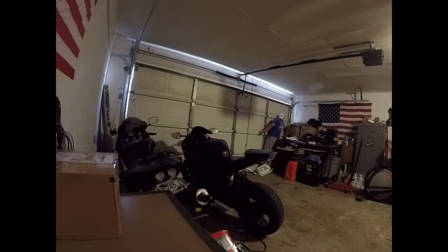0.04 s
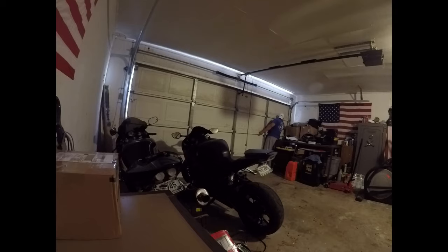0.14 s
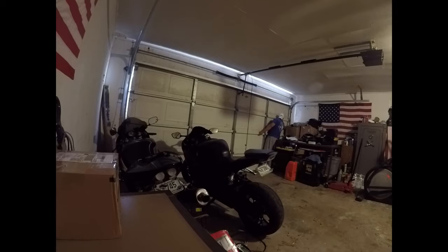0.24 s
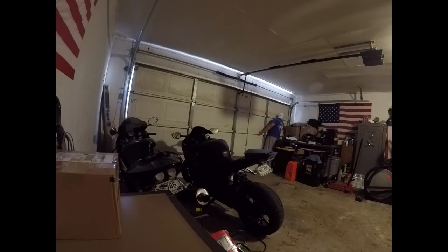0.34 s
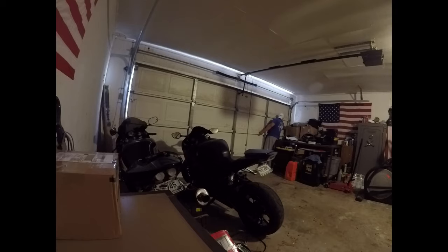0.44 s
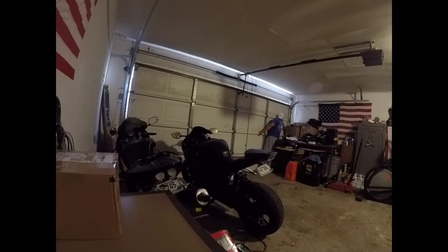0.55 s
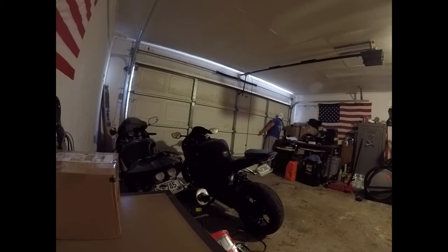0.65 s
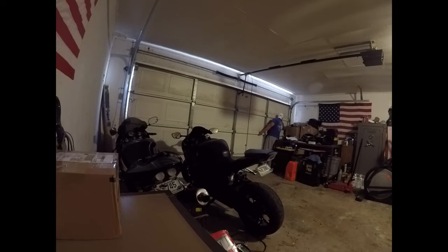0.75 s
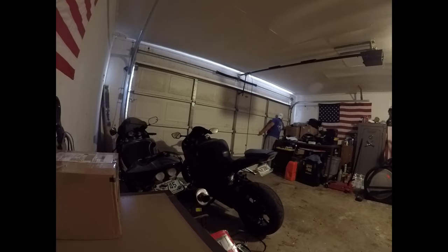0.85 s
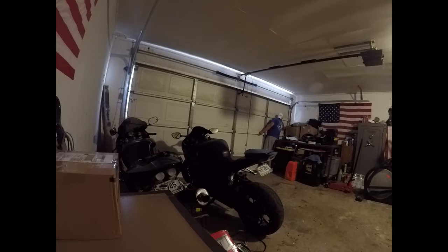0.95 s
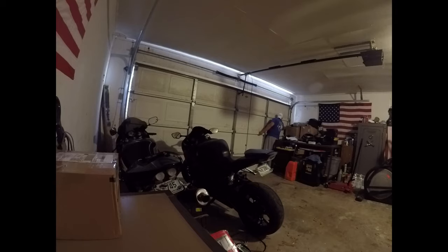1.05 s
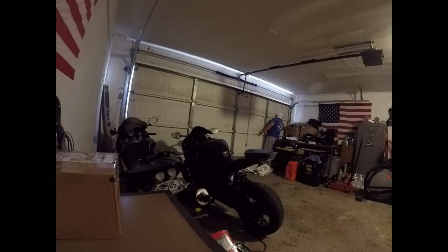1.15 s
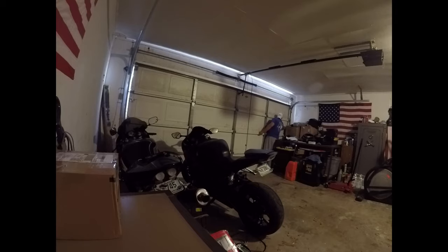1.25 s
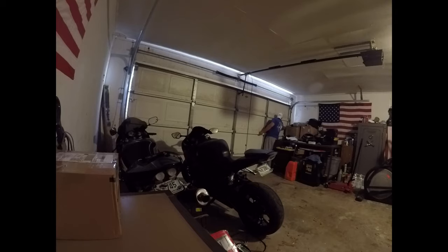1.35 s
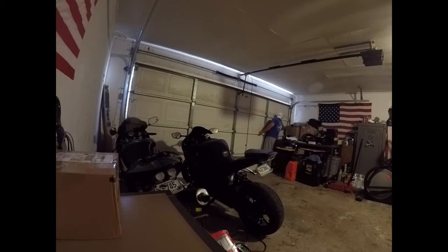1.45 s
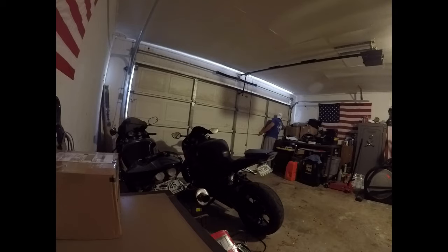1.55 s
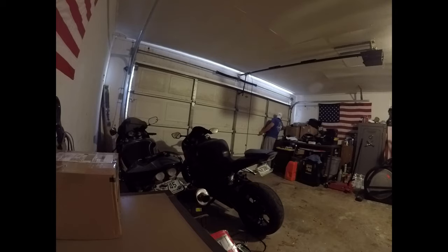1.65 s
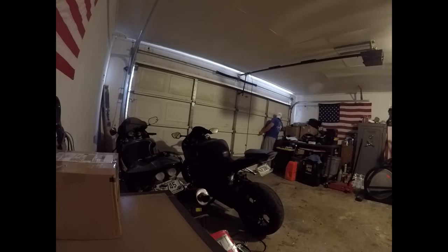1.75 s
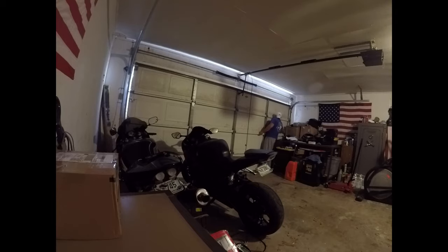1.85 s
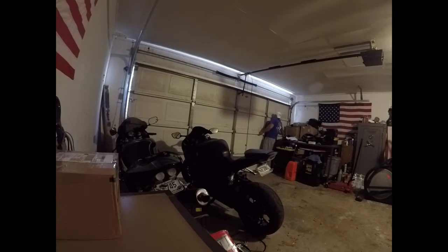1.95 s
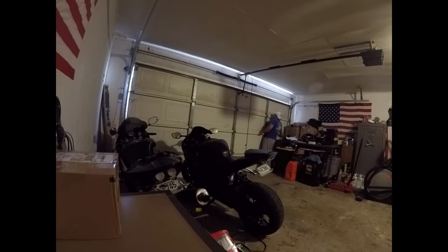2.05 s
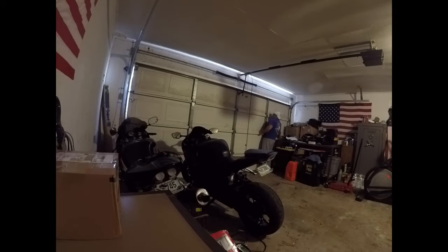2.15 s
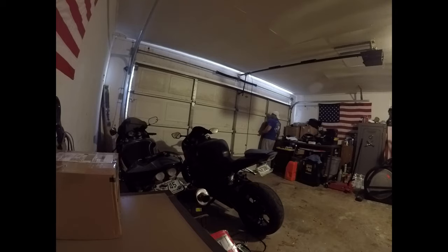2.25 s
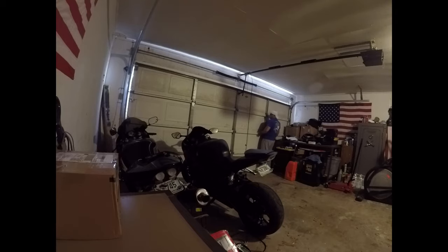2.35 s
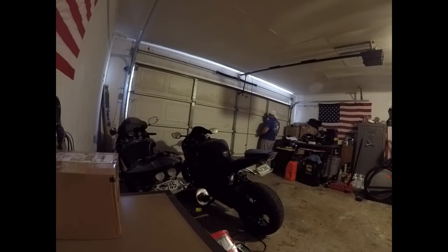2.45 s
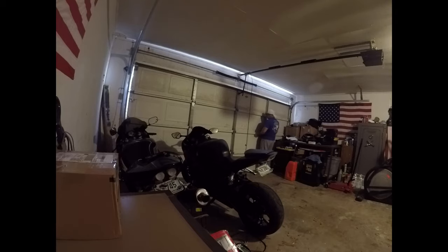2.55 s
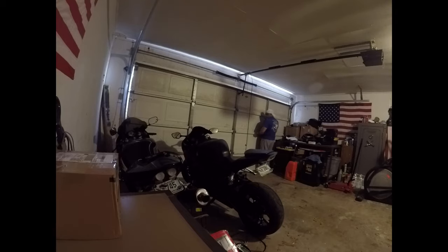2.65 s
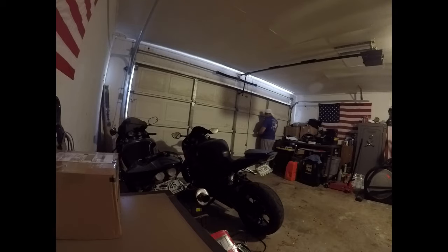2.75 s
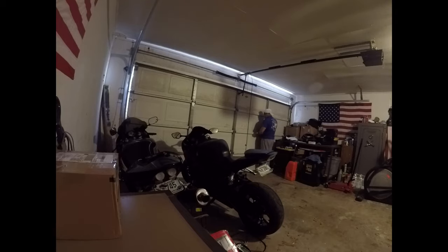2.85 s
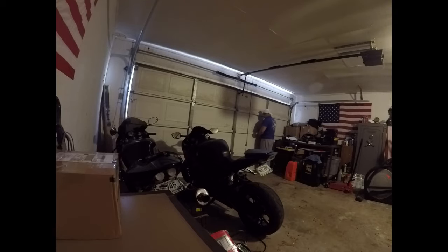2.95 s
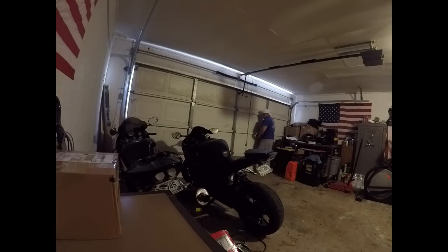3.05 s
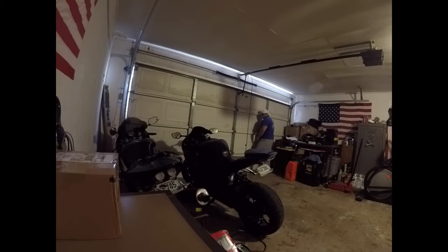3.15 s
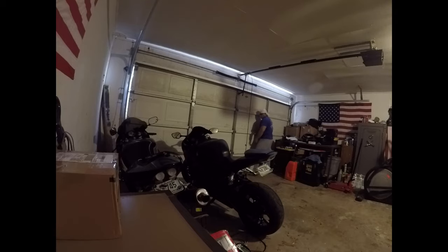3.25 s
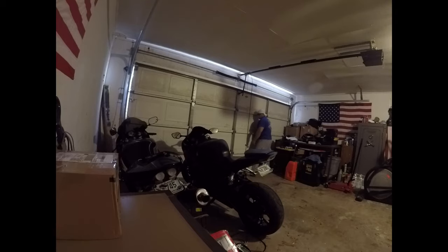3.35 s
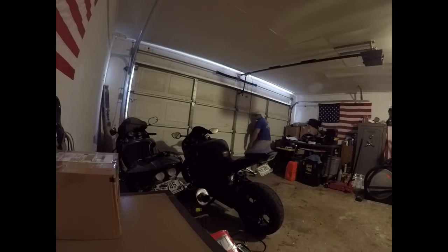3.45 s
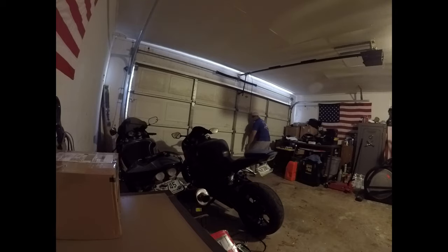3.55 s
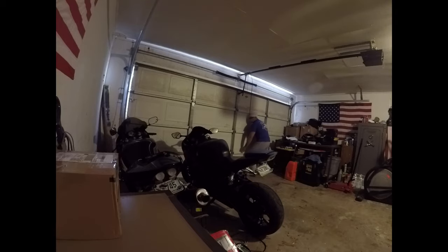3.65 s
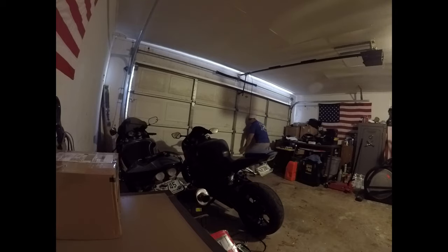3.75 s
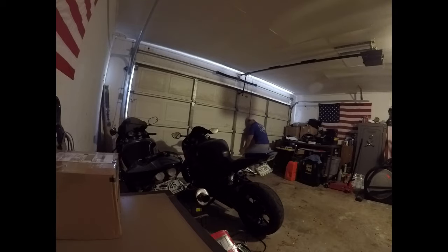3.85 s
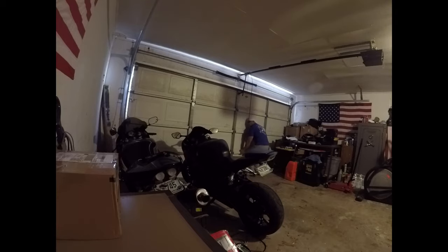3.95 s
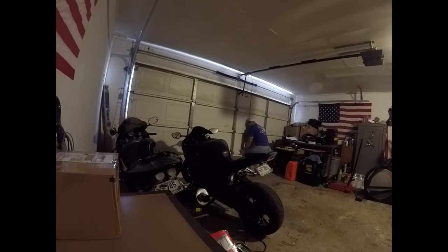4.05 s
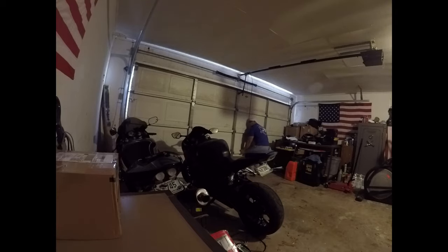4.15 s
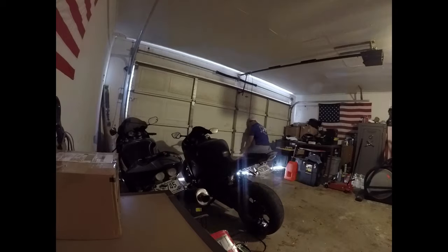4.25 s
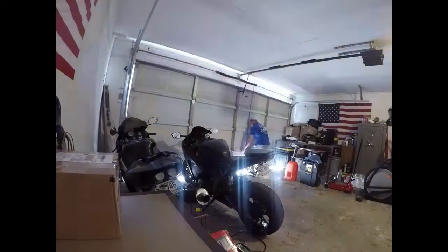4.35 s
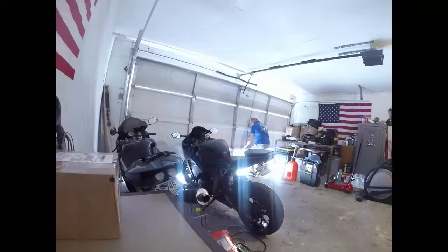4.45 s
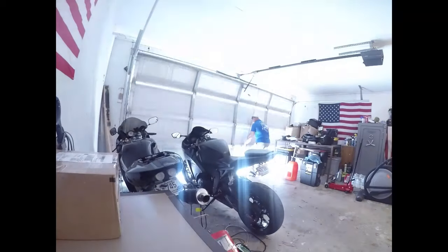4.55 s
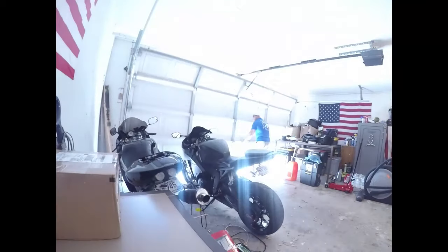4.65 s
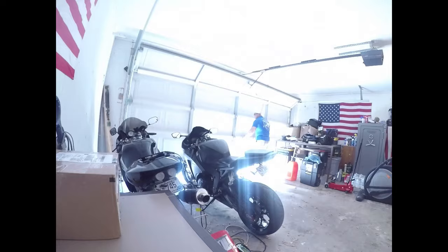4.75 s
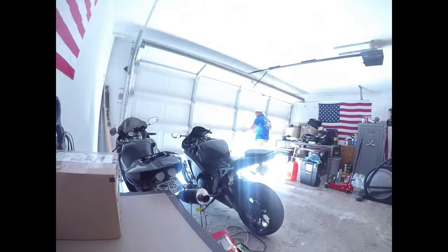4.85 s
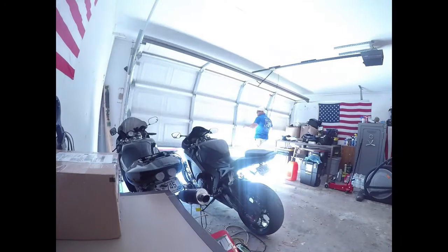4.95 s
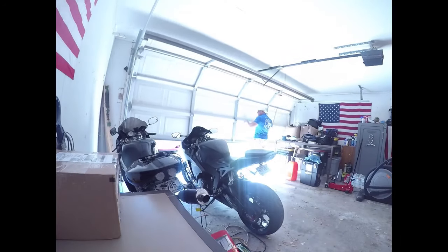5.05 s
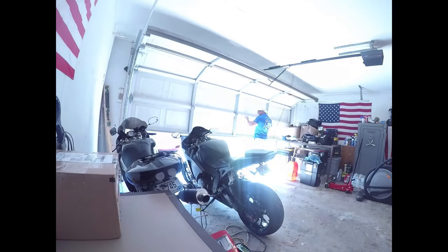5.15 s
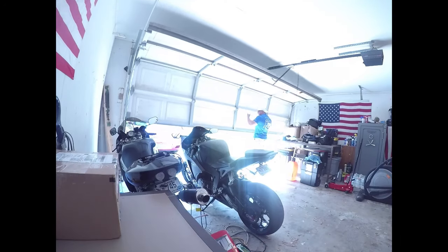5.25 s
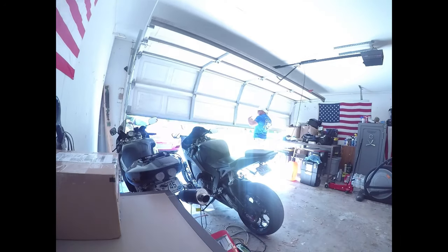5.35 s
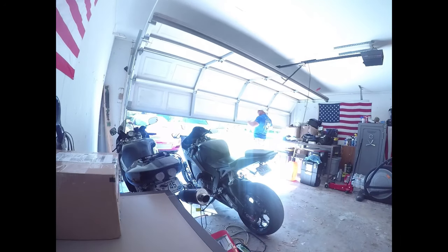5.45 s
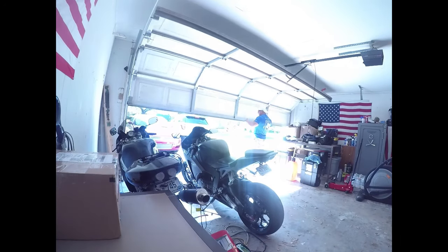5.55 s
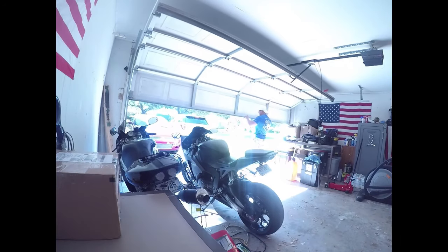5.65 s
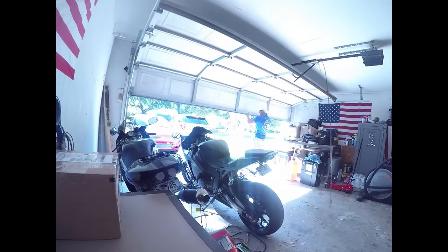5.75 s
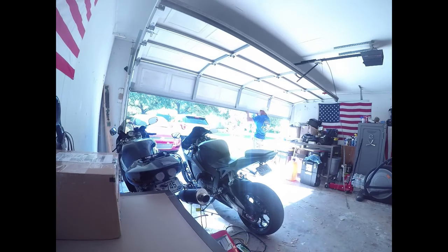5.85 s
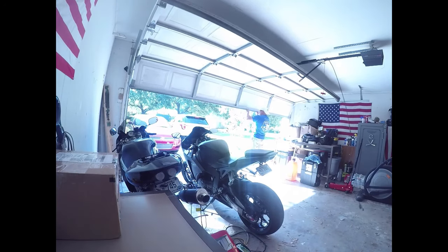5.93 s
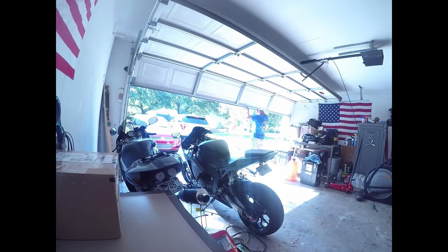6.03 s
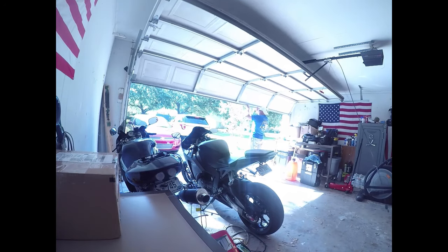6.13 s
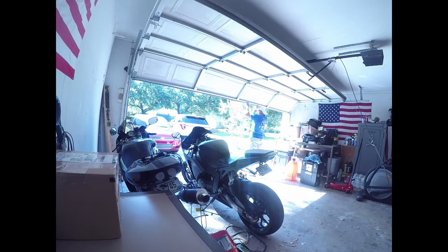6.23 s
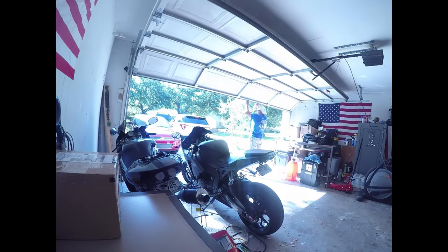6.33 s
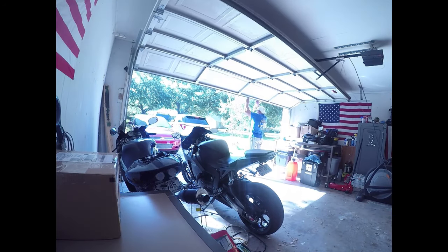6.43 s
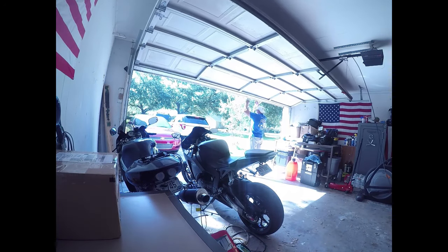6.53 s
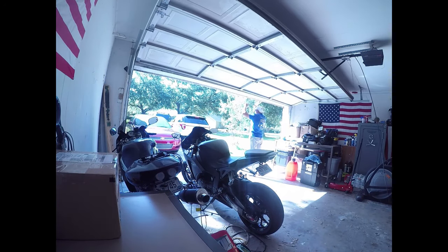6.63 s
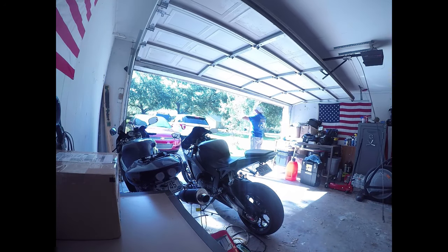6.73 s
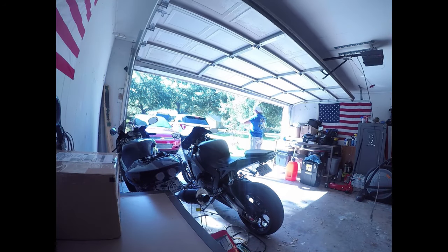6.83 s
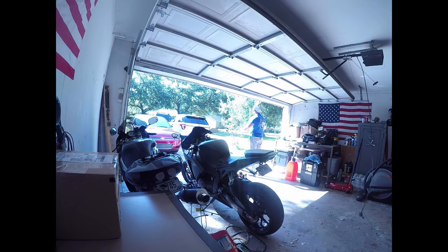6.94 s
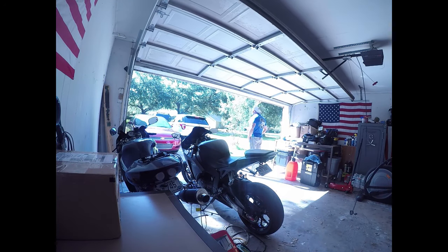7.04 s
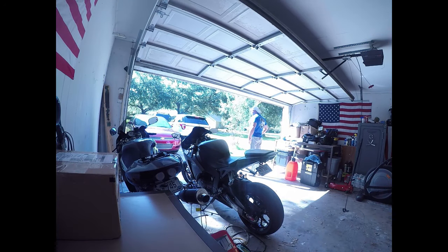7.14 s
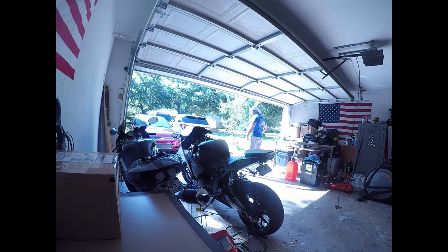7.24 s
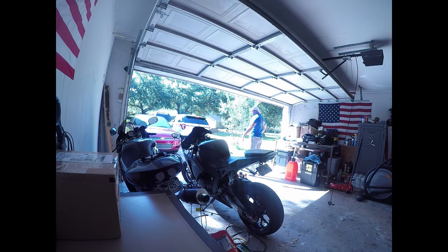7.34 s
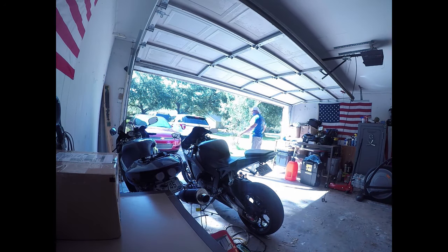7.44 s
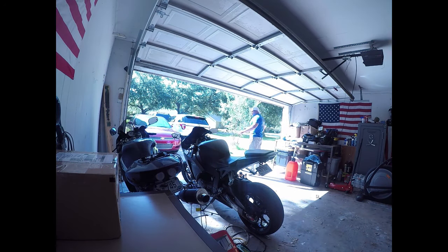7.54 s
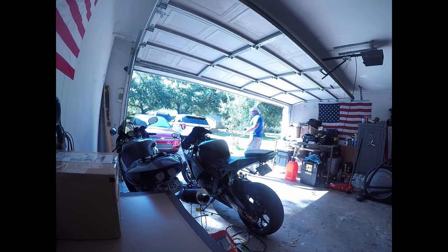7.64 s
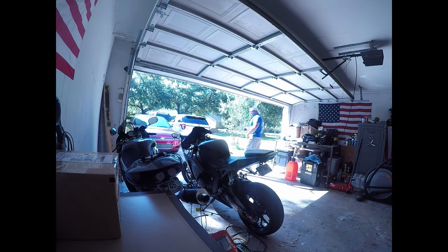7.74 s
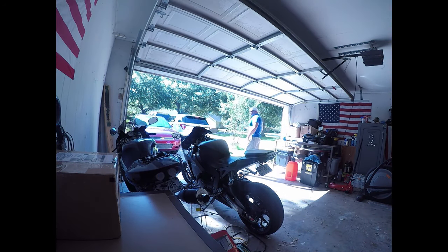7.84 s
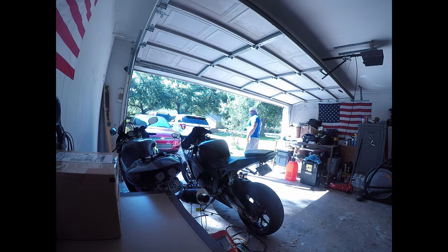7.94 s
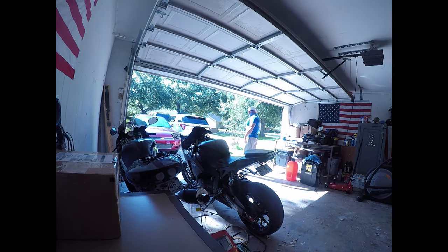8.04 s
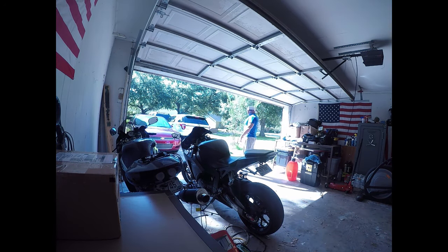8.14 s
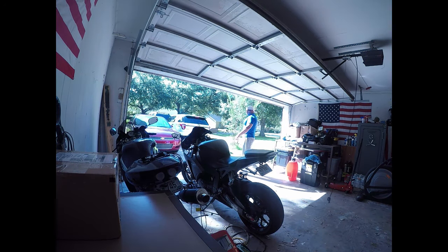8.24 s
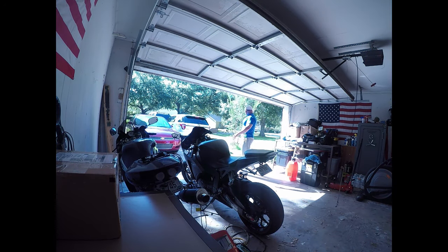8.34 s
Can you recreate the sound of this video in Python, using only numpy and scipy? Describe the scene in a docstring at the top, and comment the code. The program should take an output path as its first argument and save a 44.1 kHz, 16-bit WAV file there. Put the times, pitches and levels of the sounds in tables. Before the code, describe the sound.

From the back of a hard, echoing garage, two microphones pick up faint hiss and small metal scuffs. Light knocks come near 0.55 s, then a lock bar bangs at about 0.8 s with a low panel boom and shivering metal. At 1.5 s a latch snaps brightly and bounces. From 2 to 4 s there are only quiet clinks, a faint knock and fading low rumble. At 4.13 s the door cracks loose; from 4.5 s rollers and hinges rattle loudly up the tracks, with scraping squeals, bright tinks and deep panel thumps, strongest around 4.7-5.7 s. The clatter eases near 6.1 s, surges at 6.4 s with another boom, and drops away by 6.9 s. Weak squeaks, a soft thump at 7.15 s, hollow clacks at 7.5 s and very low swaying bumps fade into room drone and hiss until about 8.4 s.

```python
"""A sectional steel garage door is unlatched and pushed up by hand, heard from the back of a hard-walled garage.
The lock bar bangs, a latch snaps and the panels tremble; then rollers rattle and squeal up the tracks until
the door rests overhead, swaying. Random metal contacts excite five filtered ranges of the door, decaying
sines make the small hardware, gliding tones the squeals and pulsed low tones the panel booms.
Echoes carry it to two microphones, over the low rumble and drone of the sway and a faint hiss."""
import sys
import numpy as np
from scipy import signal
from scipy.fft import rfft, irfft, next_fast_len
from scipy.io import wavfile
from scipy.ndimage import uniform_filter1d

SR = 44100
rng = np.random.default_rng(int(sys.argv[2]) if len(sys.argv) > 2 else 0)


def wrap_up_sound(samples):
    """Save the sound to the file named by the first command line argument, as 16-bit audio."""
    columns = np.atleast_2d(samples).T
    # keep every value between -1 and 1, then stretch to whole-number steps
    tamed = np.clip(columns, -1, 1)
    steps = np.round(tamed * 32767).astype(np.int16)
    wavfile.write(sys.argv[1], SR, steps)


N = 369999
T = np.arange(N) / SR

# Source levels below are as at the door, before the paths to the microphones; colours are relative.
# the door's parts: panel boom, frame knock, sheet clatter, track clank, hinge chink [low f/Hz, high f/Hz]
PARTS = [(95, 300), (300, 850), (850, 2000), (2000, 5000), (5000, 15000)]
# colour of the whole door [f/Hz, spectral level/dB]
DOOR_COLOUR = [(90, -25), (160, 4), (270, -15), (380, -17.5), (520, -16.5), (1150, -13.5), (2200, -20),
               (3400, -17), (4600, -26), (6200, -19.5), (7400, -12), (8300, -20), (10300, -27),
               (11500, -36.5), (14500, -38.5)]
# narrow resonances of panels and tracks [f/Hz, width/Hz, level/dB]
DOOR_MODES = [(186, 104, 3), (525.6, 56, 4.5), (825, 12, 1), (2145, 16, -11), (3350, 82, -2),
              (4710, 110, 3), (6340, 1060, 4.5)]
# how hard the rolling door shakes: pushed off, coasting, pushed home, slowing [t/s, level/dB]
EFFORT = [(4.32, -29.5), (4.56, -19), (5.17, -15.5), (5.48, -16.5), (5.65, -15.5), (6.11, -20), (6.3, -17),
          (6.42, -14.5), (6.63, -18), (6.92, -33), (7.0, -28), (7.45, -49)]
# answer of each part of the door
# [trembling share/dB, rolling share/dB, change as the door rises/dB per s, dying/dB per s]
PART_RESPONSE = [(-23, -6.5, 0.38, 23.5), (-19.5, -8.5, 0, 61), (-26.5, -2, -1.9, 306), (-44, -5, -3, 378),
                 (-39, -8.5, -1.5, 400)]
# share of each part of the door in a blow or rub [level/dB, slope/dB per dB of brightness]
TOUCH = [(-10.5, -2), (-4.5, -1.27), (-2.5, -0.78), (-1.5, 0.4), (1.5, 2)]
# soft rubs and scuffs of the hardware [t at the peak/s, level/dB, brightness/dB]
RUBS = [(0, -53, -7), (0.34, -48.5, -6), (0.73, -51, -3.5), (1.39, -45.5, 0.5), (2.113, -49, -4),
        (2.312, -49.5, -7.5), (2.58, -54, -4), (2.69, -53.5, -3.5), (4.019, -50.5, -3.5), (4.76, -25.5, 2),
        (6.42, -24.5, -4.5), (7.77, -56.5, 6)]
# blows on lock, hinges and tracks [t/s, level/dB, brightness/dB, chatter decay/s, at least 1 ms in use]
BLOWS = [ (0.077, -44.5, -1.5, 0.0037), (0.505, -45, 1.5, 0.0075), (0.751, -29, -1, 0.02),
         (0.795, -20, 2, 0.007), (0.824, -28, -10, 0.014), (0.895, -25.5, -5.5, 0.011),
         (1.487, -36.5, -3, 0.021), (1.521, -21.5, 1.5, 0.011), (1.650, -29.5, -2.5, 0.019),
         (2.25, -44, -2.5, 0.017), (2.903, -49, -3, 0.015), (3.464, -52.5, 0.5, 0.0071),
         (3.69, -51, 0.5, 0.02), (4.065, -40, -0.5, 0.00092), (4.129, -22, -2, 0.0066),
         (4.160, -26.5, -3, 0.059), (4.47, -31, -10, 0.0086), (4.565, -31, -8, 0.0085),
         (4.636, -28.5, -7.5, 0.005), (4.702, -33.5, -5, .005), (4.816, -25.5, -4, 0.011),
         (4.964, -36, -2, 0.0036), (5.135, -23.5, 0.5, 0.0078), (5.176, -28, 1, 0.0035),
         (5.238, -27, 0, 0.0047), (5.403, -28, 0.5, 0.002), (5.477, -33, 0, 0.003),
         (5.559, -27.5, -1.5, 0.0092), (5.749, -34, -4, 0.0043), (5.78, -29, -1.5, 0.0046),
         (6.181, -31, -2, 0.0024), (6.29, -32.5, -9.5, 0.0044), (6.346, -33, -0.5, 0.0071),
         (6.379, -27.5, 0.5, 0.0055), (6.5, -32.5, -11.5, 0.0042), (6.547, -31, -9.5, 0.0067),
         (6.77, -41.5, -9, 0.0042), (6.838, -36, -1.5, 0.012), (7.304, -47.5, -3, 0.0013),
         (7.513, -47, -1.5, 0.003)]
# panels flex with a dull thump [t/s, level/dB]
THUMPS = [(0.812, -27), (1.056, -28), (1.521, -27.5), (2.257, -38.5), (4.24, -25), (4.724, -15),
          (4.812, -20), (5.142, -20.5), (5.22, -19.5), (7.141, -29)]
# dry rollers and pins squeal and groan, or scrape when the pitch wavers widely
# [t/s, length/s, start f/Hz, end f/Hz, level/dB, rms waver/share of f]
SQUEALS = [ (0.365, 0.04, 8480, 8440, -35, 0.0015), (4.144, 0.062, 1090, 1157, -19.5, 0.084),
           (4.368, 0.037, 1197, 1094, -23, 0.18), (4.511, 0.21, 1147, 1354, -15.5, 0.31),
           (4.518, 0.037, 10300, 10490, -27.5, 0.003), (4.52, 0.04, 13650, 13650, -39, .004),
           (4.547, 0.054, 6670, 6390, -21, 0.011), (4.722, 0.054, 2900, 2616, -15, 0.24),
           (4.93, 0.14, 1641, 1256, -17, 0.2), (5.073, 0.03, 8200, 7900, -23.5, 0.013),
           (5.105, 0.045, 7470, 7230, -17.5, 0.013), (5.599, 0.17, 5250, 4030, -20.5, 0.024),
           (5.629, 0.067, 4820, 4770, -26, 0.0099), (5.76, 0.19, 4090, 4000, -23.5, 0.018),
           (5.94, 0.065, 3900, 3690, -30, 0.019), (5.9, 0.03, 6040, 5880, -25.5, 0.0092),
           (6.208, 0.032, 1950, 1860, -27, 0.012), (6.34, 0.014, 1960, 1940, -31, 0.014),
           (6.835, 0.059, 1864, 1854, -36.5, 0.018), (6.94, 0.057, 1855, 1890, -34, 0.016),
           (6.945, 0.071, 3740, 3760, -43, 0.03), (7.0, 0.114, 1900, 1830, -39, 0.02),
           (7.376, 0.053, 3140, 3060, -52, 0.014), (7.902, 0.063, 370, 449, -45.5, .35)]
# panels boom or hum as they are jolted or bend through the curve of the track
# [t at the peak/s, half width/s, f/Hz, level/dB]
BOOMS = [(0.48, 0.12, 190, -39.5), (0.835, 0.0093, 171, -13), (1.07, 0.022, 165.6, -15),
         (1.38, 0.2, 176.8, -32.5), (4.278, 0.053, 165, -23), (4.691, 0.085, 175, -22),
         (4.849, 0.058, 160, -12), (5.235, 0.018, 160, -14), (5.321, 0.042, 160, -13),
         (5.452, 0.088, 105, -24), (5.681, 0.18, 119, -21), (6.408, 0.027, 155, -21),
         (6.481, 0.088, 125, -14.5), (7.18, 0.052, 235.3, -30), (7.6, 0.23, 162.2, -38)]
# the spring latch snaps home and bounces [t/s, level/dB]
SNAPS = [(1.5396, -11.5), (1.544, -25), (1.5505, -21)]
# steel rings of the latch [f/Hz, level/dB, t60/s]
LATCH_MODES = [(3010, -8, 0.04), (6330, 7, 0.029), (6720, 13, .04), (6950, 21, 0.037), (6970, 5, .035),
               (8260, 3, .012), (8540, 2, 0.025)]
# light knocks on something close by [t/s, level/dB]
KNOCKS = [(0.547, -32.5), (0.579, -38.5), (0.603, -40.5), (0.63, -54), (3.347, -49.5)]
# rings of a light knock [f/Hz, level/dB, t60/s]
KNOCK_MODES = [(540, 4, 0.04), (750, 7, 0.022), (935, 8.5, 0.02), (1160, 8, 0.022), (1380, 5, 0.016),
               (1640, -4, .014), (1850, -9, .01)]
# hinge pins tink brightly as the panels fold and settle [t/s, level/dB]
TINKS = [(4.912, -24.5), (5.486, -23), (6.836, -40), (7.218, -50), (7.304, -42.5)]
# rings of a hinge pin [f/Hz, level/dB, t60/s]
TINK_MODES = [(6340, 4.5, 0.027), (6700, -5, 0.017), (7160, 5, 0.028), (7470, -6, 0.03)]
# the lock hardware clinks as it is handled [t/s, level/dB]
CLINKS = [(0.078, -44), (2.250, -45), (2.260, -39), (2.275, -41), (2.595, -53), (2.685, -54), (2.905, -48),
          (2.915, -55)]
# rings of the lock hardware [f/Hz, level/dB, t60/s]
CLINK_MODES = [(364, 0, .06), (790, -9, .015), (1460, 0, 0.017), (2430, -1, 0.013), (3080, 2, .024),
               (3380, -1, .018)]
# loose steel clacks hollowly, hardest as the door meets its stop [t/s, level/dB]
CLACKS = [(7.515, -35), (7.528, -38), (7.549, -39.5), (7.576, -46)]
# rings of the loose steel [f/Hz, level/dB, t60/s]
CLACK_MODES = [(825, 4.5, .05), (930, 1, .03), (1024, 5, .03), (1280, 5, 0.028), (1980, 1, 0.013),
               (2700, 5, 0.012), (2820, 6, .011), (3420, 2, 0.0089), (3670, -7, .008)]
# the rocking door gives soft, very low bumps [t/s, level/dB]
BUMPS = [(1.56, 3), (2.55, 0), (2.80, -2), (3.09, -4), (7.60, 1.5), (7.885, 1), (8.13, -5)]
# rings of a bump [f/Hz, level/dB, t60/s]
BUMP_MODES = [(30.2, 4.5, 0.3), (57.6, -1, 0.18)]
# answer of the sway's rumble and drone
# [trembling share/dB, rolling share/dB, change as the door rises/dB per s, dying/dB per s]
SWAY_RESPONSE = [(-15, -14, 0, 8), (-21, -12, 0, 12)]
# colour of the sway's rumble [f/Hz, spectral level/dB]
RUMBLE_COLOUR = [(10, 3), (25, -13), (45, 4), (80, -6), (200, -67)]
# low standing waves of the garage [f/Hz, spectral level/dB]
DRONE_COLOUR = [(35, -6), (51, -22), (61, 18), (75, -4), (88, 8.5), (100, 8.5), (110, 0.5), (122, 6),
                (140, 7.5), (165, -40), (300, -65)]
# the drone swells, most as the door tips overhead [t/s, level/dB]
SWELLS = [(2.55, 8), (5.6, 11), (7.15, 5.5)]
# garage reverberation [f/Hz, t60/s]
GARAGE = [(150, 0.96), (300, 1.76), (700, 0.82), (1800, 0.75), (4500, 0.52), (7500, 0.58), (13000, 0.44)]
# likeness of the two microphone channels [f/Hz, correlation]
LIKENESS = [(40, 0.74), (140, 0.97), (280, 0.78), (550, 0.7), (1100, -0.083), (2200, 0.27), (4500, 0.67),
            (8000, -0.16), (12000, -0.11)]
# lean of the diffuse field [f/Hz, right over left level/dB]
LEAN = [(120, 2.5), (300, 0.3), (2000, 1), (3000, -0.5), (5200, 2), (6600, 3), (8700, -6), (11000, -0.5)]
# still air and microphone hiss [f/Hz, spectral level/dB]
HISS_COLOUR = [(100, -10), (160, 21.5), (500, -0.5), (2000, -3), (5400, -12), (7500, -3), (8500, -8),
               (11000, -13), (14500, -37)]
# the recorder's own low noise [f/Hz, spectral level/dB]
SELF_NOISE_COLOUR = [(20, 0), (90, -12), (300, -30)]
# the microphone's wind filter lets go of the bass [t/s, share of bass let through]
BASS_OPEN = [(0, .006), (1.03, .006), (1.2, 1)]

LIFT_S, LIFT_ATTACK_S = 4.13, 0.044   # the door leaves the floor
REST_RISE_DB_PER_S = 0.5   # slow creep of the small shaking left after the last point of EFFORT
TREMBLE_DB_PER_S = 12.5   # fall of the shut door's trembling after a blow
THUMP_DECAY_S = 0.0084
RUB_ATTACK_S, RUB_DB_PER_S = 0.064, 55
SQUEAL_FLUTTER_DB = 3   # rms; the grip of a dry roller comes and goes
BOOM_WAVER = 0.0508   # rms share of the pitch
SWELL_WIDTH_S = 0.28
HISS_DB, SELF_NOISE_DB = -50, -63   # rms
CUTOFF_HZ = 15200


def rattle(rooms, parts, tremble, roll, per_s, spread_db):
    """Rollers and hinges knock at random all over the door, as hard as it trembles, rolls or is rubbed."""
    knocking = sum(through(contacts(per_s, spread_db, N), room) for room in rooms)
    out = 0
    for part, rub, response in zip(parts, rubbing(), PART_RESPONSE):
        tremble_db, roll_db, rise_db_per_s, dying = response
        rolling_drive = roll * from_db(roll_db + rise_db_per_s * (T - LIFT_S))
        rolled = lingering(rolling_drive, dying)
        trembled = from_db(tremble_db) * tremble
        gain = np.sqrt(trembled ** 2 + rolled ** 2 + rub ** 2)
        out = out + gain * evened(through(knocking, part), span_s=0.16)
    return out


def rolling():
    """The shaking starts at the lift and follows the effort of the push."""
    s, db = np.transpose(EFFORT)
    resting_s = np.maximum(T - s[-1], 0)
    started = np.clip((T - LIFT_S) / LIFT_ATTACK_S, 0, 1)
    return started * from_db(np.interp(T, s, db) + REST_RISE_DB_PER_S * resting_s)


def trembling():
    """Every blow on the shut door leaves it shivering in its frame; the powers add."""
    power = 0
    for s, db, *_ in BLOWS:
        if s < LIFT_S:
            power = power + (T >= s) * from_db(db - TREMBLE_DB_PER_S * np.abs(T - s)) ** 2
    return np.sqrt(power)


def rubbing():
    """Each rub swells and fades; one envelope for each part of the door."""
    power = 0
    for s, db, brightness in RUBS:
        attack = np.exp(np.minimum(T - s, 0) / RUB_ATTACK_S)
        fade = from_db(-RUB_DB_PER_S * np.maximum(T - s, 0))
        power = power + np.outer(from_db(touch_db(db, brightness)) ** 2, (attack * fade) ** 2)
    return np.sqrt(power)


def blows(rooms, parts, per_s, spread_db):
    """A touch and a dying chatter of loose parts, felt at two places; a thump stirs only the panel boom."""
    dry, t = np.zeros((len(rooms), N)), T[:SR // 10]
    hits = [(s, touch_db(db, brightness), decay) for s, db, brightness, decay in BLOWS]
    hits += [(s, [db], THUMP_DECAY_S) for s, db in THUMPS]
    for k, (s, levels, decay) in enumerate(hits):
        for place in (k, k + 1):
            burst = contacts(per_s, spread_db, len(t))
            burst[0] += 2   # the touch itself
            burst *= np.exp(-t / max(decay, 1e-3))
            rings = signal.fftconvolve(burst[None], np.array(parts[:len(levels)]), axes=1)
            gains = from_db(levels) / np.linalg.norm(rings, axis=1)
            add(dry[place % len(rooms)], s, gains @ rings / np.sqrt(2))
    return sum(through(x, room) for x, room in zip(dry, rooms))


def door_part(low, high, size=8192):
    """Ring of one part of the door after a unit tap: minimum phase, energy 1."""
    hz = np.fft.rfftfreq(size, 1 / SR) + 1
    level = at_hz(DOOR_COLOUR, hz)
    for f, width, db in DOOR_MODES:
        level = level + db / (1 + (2 * (hz - f) / width) ** 2)
    edges = np.sqrt((1 + (low / hz) ** 16) * (1 + (hz / high) ** 12))
    gain = from_db(level) / edges + 1e-5
    # folding the cepstrum gives the phase of a ring that starts at once
    cepstrum = irfft(np.log(gain))[:size // 2]
    cepstrum[0] = 0
    ring = irfft(np.exp(rfft(2 * cepstrum, size)))
    return ring / np.linalg.norm(ring)


def contacts(per_s, spread_db, size):
    """Metal touching metal at random moments with uneven force and either sign."""
    force = from_db(spread_db * np.minimum(rng.exponential(1, size), 4))
    touching = rng.random(size) < per_s / SR
    return touching * force * rng.choice([-1, 1], size)


def touch_db(db, brightness_db):
    """Level of each part of the door: a harder contact favours the small hardware over the panels."""
    share, slope = np.transpose(TOUCH)
    return db + share + slope * brightness_db


def lingering(drive, db_per_s):
    """Motion of a part that stores the energy of its drive and loses it at a steady rate."""
    keep = from_db(-db_per_s / SR) ** 2
    return np.sqrt(signal.lfilter([1 - keep], [1, -keep], drive ** 2 + 1e-18))


def squeals():
    """Stick and slip make a wavering, fluttering, gliding tone that swells and stops."""
    out = np.zeros(N)
    for s, length, start_hz, end_hz, db, waver in SQUEALS:
        size = int(length * SR)
        flutter = from_db(SQUEAL_FLUTTER_DB * wander(size=200)[:size])
        grip = flutter * signal.windows.tukey(size, .5)
        tone = grip * wavering(np.geomspace(start_hz, end_hz, size), waver, size=120)
        add(out, s, from_db(db) * tone / np.linalg.norm(tone))
    return out


def booms():
    """A bending panel swells at one low, wavering pitch and settles again."""
    out, t = np.zeros(N), T[:SR] - .5
    for s, width, hz, db in BOOMS:
        tone = rms_one(wavering(np.full(SR, hz), BOOM_WAVER, size=600))
        add(out, s - .5, from_db(db) * tone * np.exp(-(t / width) ** 2))
    return from_db(-3.5) * out


def latch_and_knocks(room):
    """The latch and the things knocked close by ring in plain sight: strong direct sound."""
    near = struck(SNAPS, LATCH_MODES) + struck(KNOCKS, KNOCK_MODES, chatter_s=0.004)
    return in_sight(near, room, room_db=-3.5, direct_db=23.5)


def tracks_and_lock(room):
    """Hinge tinks, lock clinks and overhead squeals, also in plain sight."""
    tinks = struck(TINKS, TINK_MODES, chatter_s=0.005)
    clinks = struck(CLINKS, CLINK_MODES, chatter_s=0.0063)
    return in_sight(tinks + clinks + squeals(), room, room_db=-4.0, direct_db=24.0)


def end_stop(room):
    """Loose steel clacks at the end of the track, which is closest, so driest."""
    clacks = struck(CLACKS, CLACK_MODES, chatter_s=0.013)
    return in_sight(clacks, room, room_db=-7.0, direct_db=26.5)


def bumps():
    """The rocking door's low modes sound for a tenth of a second at each bump."""
    return struck(BUMPS, BUMP_MODES)


def struck(strikes, modes, chatter_s=0):
    """A struck part rings briefly as decaying sines; a loose one chatters against its seat."""
    out, t = np.zeros(N), T[:SR // 10]
    for s, db in strikes:
        ring = 0
        for hz, level, t60 in modes:
            uneven_db = rng.normal(0, 1.5)
            ring = ring + from_db(level + uneven_db - 60 * t / t60) * np.sin(2 * np.pi * hz * t)
        if chatter_s > 0:
            chatter = contacts(per_s=700, spread_db=5.0, size=len(t)) * np.exp(-t / chatter_s)
            ring = ring + 0.42 * signal.fftconvolve(ring, chatter)[:len(t)]
        add(out, s, from_db(db) * ring / np.linalg.norm(ring))
    return out


def sway(tremble, roll):
    """Flexing panels pump the air and stir the garage's lowest standing waves, driven by tremble and roll."""
    levels = []
    for tremble_db, roll_db, rise_db_per_s, dying in SWAY_RESPONSE:
        rolled = from_db(roll_db + rise_db_per_s * (T - LIFT_S)) * roll
        levels.append(lingering(from_db(tremble_db) * tremble + rolled, dying))
    rumble, drone = levels
    swell_db = sum(db * np.exp(-((T - s) / SWELL_WIDTH_S) ** 2) for s, db in SWELLS)
    return rumble * background(RUMBLE_COLOUR) + drone * from_db(swell_db) * background(DRONE_COLOUR)


def hiss():
    """Still air and microphone hiss: steady coloured noise."""
    return from_db(HISS_DB) * background(HISS_COLOUR)


def background(colour):
    """Diffuse noise for the whole scene."""
    return diffuse(colour, size=next_fast_len(N))[:, :N]


def diffuse(colour=((1, 0), (SR, 0)), size=N):
    """Coloured noise arriving from all sides at two close microphones; rms 1."""
    hz = np.fft.rfftfreq(size, 1 / SR)
    mid, side = rfft(rng.standard_normal((2, size)))
    alike = np.clip(at_hz(LIKENESS, hz), -.99, .99)
    sign = np.array([[-1], [1]])   # left, right
    pair = np.sqrt(1 + alike) * mid + sign * np.sqrt(1 - alike) * side
    level = at_hz(colour, hz) + sign * at_hz(LEAN, hz) / 2
    return rms_one(irfft(pair * from_db(level), size))


def garage(direct_db, early_db, early_s, build_s):
    """Direct sound, a few wall echoes and a diffuse tail that builds up, then dies band by band."""
    size = 3 * SR // 2
    t, centres = T[:size], np.geomspace(100, 14000, num=8)
    field, hz = rfft(diffuse(size=size)), np.fft.rfftfreq(size, 1 / SR)
    out = 0
    for centre, share in zip(centres, np.eye(len(centres))):
        band = irfft(field * at_hz(np.c_[centres, share], hz), size)
        out = out + band * from_db(-60 * t / at_hz(GARAGE, centre))
    out *= 1 - np.exp(-t / build_s)
    out[:, 0] += from_db(direct_db)
    for when, force, angle in rng.random((8, 3)):
        at = int((.003 + when * early_s) * SR)
        other_side = at + round(8 * angle) - 4   # a slanted echo reaches one side first
        out[[0, 1], [at, other_side]] += from_db(early_db) * (2 * force - 1)
    return out


def in_sight(source, room, room_db, direct_db):
    """A source with a clear path to the microphones: its room sound plus extra direct sound."""
    return from_db(room_db) * through(source, room) + from_db(direct_db) * source


def through(x, response):
    """Pass a signal through a one- or two-channel impulse response."""
    return signal.fftconvolve(np.atleast_2d(x), np.atleast_2d(response), axes=-1)[:, :N]


def wavering(hz, waver, size):
    """A tone whose pitch wanders by a share of itself."""
    pitch = hz * (1 + waver * wander(size)[:len(hz)])
    return np.sin(2 * np.pi * np.cumsum(pitch) / SR)


def wander(size):
    """One second of chance, smoothed over size samples; rms 1."""
    return rms_one(uniform_filter1d(rng.standard_normal(SR), size=size))


def evened(x, span_s):
    """Hold the slow level at rms 1 and keep the fast grain."""
    power = uniform_filter1d(np.mean(x ** 2, axis=0), int(span_s * SR))
    return x / np.sqrt(power + 1e-12)


def from_db(db):
    """Decibels to gain."""
    return 10 ** (np.asarray(db) / 20)


def rms_one(x):
    """Scale to rms 1."""
    return x / np.sqrt(np.mean(x ** 2) + 1e-20)


def at_hz(points, hz):
    """Read a table on a log-frequency axis."""
    f, value = np.transpose(points)
    return np.interp(np.log(hz + 1e-9), np.log(f), value)


def add(out, s, sound):
    """Mix a short sound in at time s."""
    at = max(round(s * SR), 0)
    out[at:at + len(sound)] += sound[:N - at]


def scene():
    """Four places on the door each reach the microphones by their own echoes, over a faint hiss."""
    rooms = [garage(direct_db=15.0, early_db=17.5, early_s=.02, build_s=0.00073) for _ in range(4)]
    parts = [door_part(low, high) for low, high in PARTS]
    tremble, roll = trembling(), rolling()
    door = rattle(rooms, parts, tremble, roll, per_s=45, spread_db=4.0)
    door = door + blows(rooms, parts, per_s=3000, spread_db=3.5)
    hardware = latch_and_knocks(rooms[0]) + tracks_and_lock(rooms[1]) + end_stop(rooms[2])
    return door + hardware + booms() + bumps() + sway(tremble, roll) + hiss()


def record(dry):
    """A wind filter thins the early bass; low noise is added, peaks are rounded and the top is cut."""
    wind_filter = signal.cheby1(8, .5, 134, "high", fs=SR, output="sos")
    thin = signal.sosfilt(wind_filter, dry)
    bass = np.interp(T, *np.transpose(BASS_OPEN))
    heard = bass * dry + (1 - bass) * thin
    heard = heard + from_db(SELF_NOISE_DB) * background(SELF_NOISE_COLOUR)
    rounded = 1.3 * np.tanh(heard / 1.3)
    top_cut = signal.ellip(10, .2, 80, CUTOFF_HZ, fs=SR, output="sos")
    return signal.sosfilt(top_cut, rounded)


dry = scene()
out = record(dry)
wrap_up_sound(out)
```